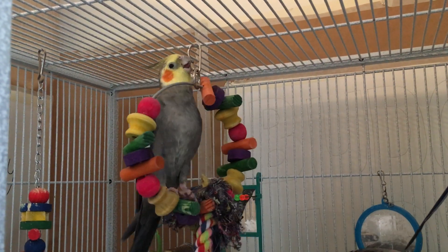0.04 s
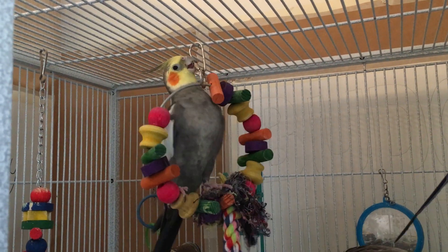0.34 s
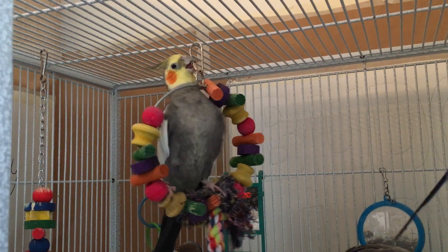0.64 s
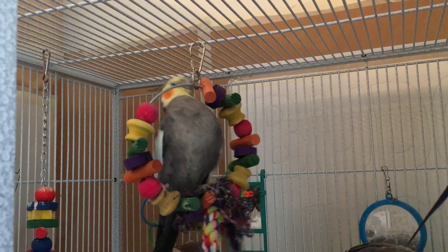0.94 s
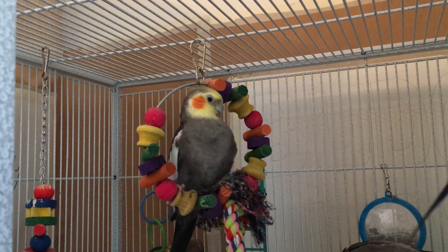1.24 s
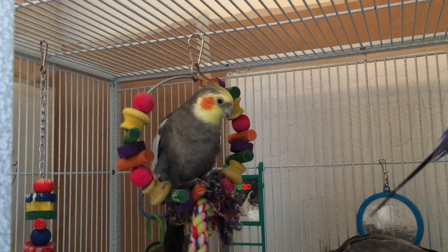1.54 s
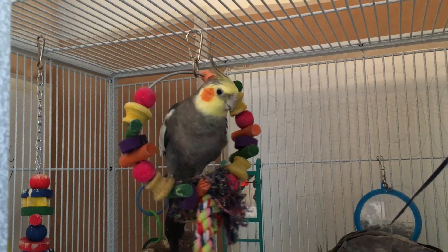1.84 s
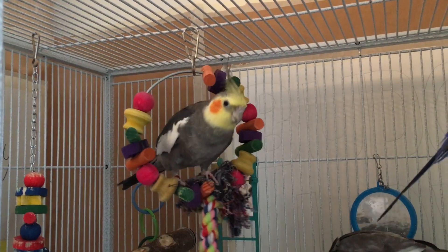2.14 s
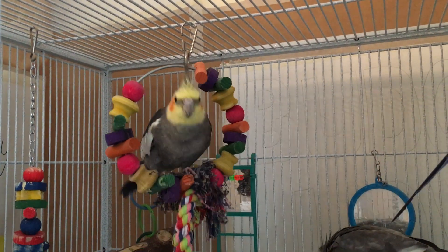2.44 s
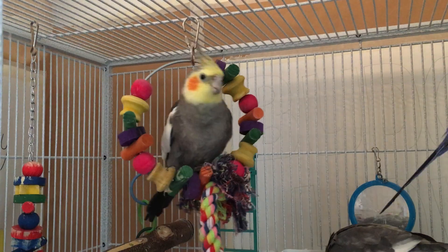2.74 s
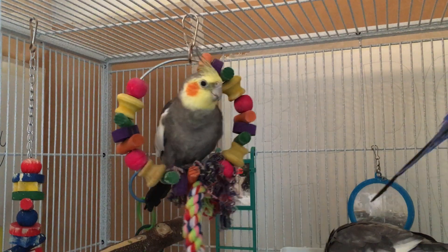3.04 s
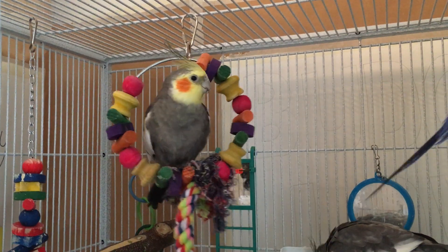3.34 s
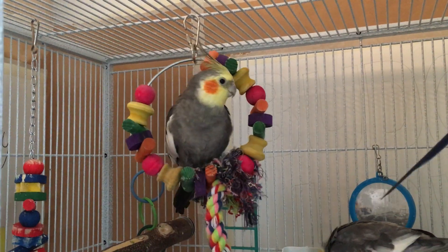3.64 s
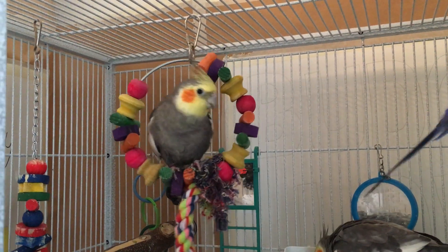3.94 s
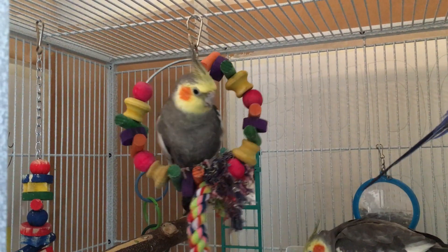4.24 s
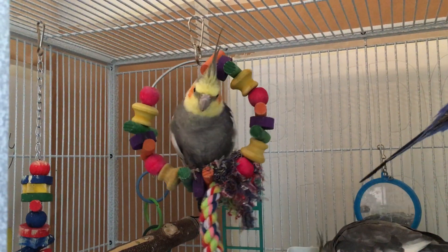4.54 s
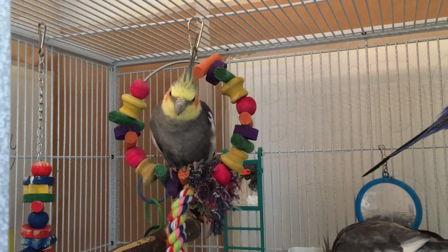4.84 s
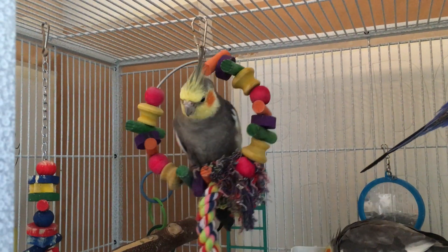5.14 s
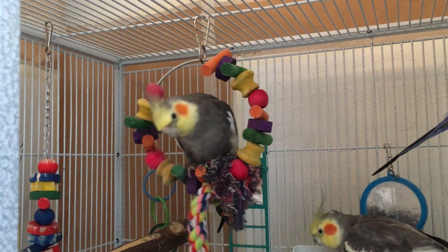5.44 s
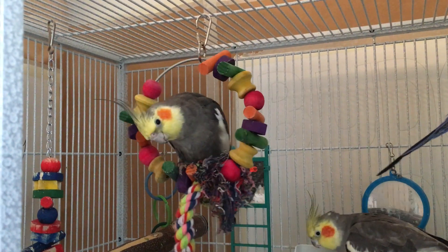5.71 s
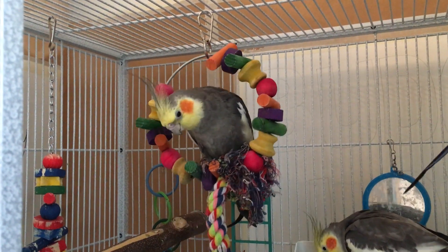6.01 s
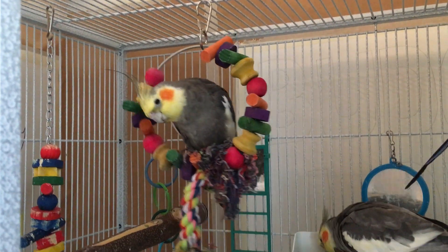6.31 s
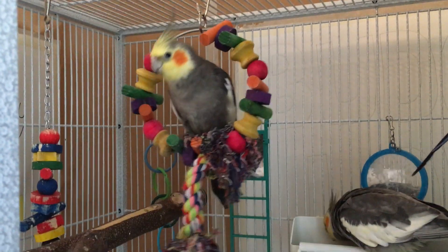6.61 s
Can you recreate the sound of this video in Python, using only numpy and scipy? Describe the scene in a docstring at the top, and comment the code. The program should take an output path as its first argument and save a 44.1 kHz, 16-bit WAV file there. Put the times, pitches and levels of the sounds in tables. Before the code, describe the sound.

Cockatiels chatter close to the microphone in a small, quiet room. A light tap on the wire cage comes first, then short gliding chirps that break into rasps. After a pause of about a second, the chirps return and build into a long run of harsh squawks, with soft bursts of whirring wings and a faint low hum underneath. A last few squawks and peeps follow.

```python
"""Cockatiels chatter close by: gliding chirps that break into rough noise, then a long run of harsh squawks.
A bird's voice organ whistles when it vibrates evenly and rasps when it vibrates chaotically.
Wings whirr in four bursts, pushing air and setting off a low hum, and something taps the wire cage.
A small, quiet room gives every call and tap a short tail of echoes."""
import sys
import numpy as np
from scipy import signal
from scipy.fft import rfft, irfft, next_fast_len
from scipy.io import wavfile
from scipy.ndimage import uniform_filter1d, map_coordinates

SR = 44100
rng = np.random.default_rng(int(sys.argv[2]) if len(sys.argv) > 2 else 0)


def wav_record(signal):
    """Record a signal, one row per channel, as 16-bit PCM in the file named by sys.argv[1]."""
    frames = np.transpose(np.atleast_2d(signal))
    bounded = np.clip(frames, -1, 1)
    # unit amplitude maps onto the largest positive 16-bit level
    quanta = np.round(bounded * 32767).astype(np.int16)
    wavfile.write(sys.argv[1], SR, quanta)


N = 298557
TIME = np.arange(N) / SR
TOP_HZ = 15900


def amp(db):
    """Turns decibels into a gain."""
    return 10 ** (np.asarray(db) / 20)


def unit(x):
    """Scales a sound to an average (rms) level of 1."""
    return x / np.sqrt(np.mean(x ** 2))


def gain_at(points, where):
    """Reads a gain off a curve of (frequency, level_db) points."""
    at, db = np.transpose(points)
    return amp(np.interp(np.log(np.maximum(where, at[0])), np.log(at), db))


def coloured(x, points):
    """Shapes the bass and treble of x by such a curve, at level 1."""
    return unit(irfft(rfft(x) * gain_at(points, np.fft.rfftfreq(len(x), 1 / SR)), len(x)))


def wobble(n, rate_hz):
    """A smooth random wiggle, about 1 in size, with rate_hz new values a second."""
    at = np.arange(n) * rate_hz / SR
    values = rng.standard_normal(int(at[-1]) + 2)
    return map_coordinates(values, [at], mode="nearest")


def add(mix, start_s, sound):
    """Mixes a sound in at start_s."""
    part = mix[round(start_s * SR):][:len(sound)]
    part += sound[:len(part)]


def fade(t, start, end, ramp_s):
    """Fades in at start and out at end."""
    return np.clip(np.minimum(t - start, end - t) / ramp_s, 0, 1)


def progress(x, begin, end):
    """Goes from 0 at begin to 1 at end."""
    return np.clip((x - begin) / (end - begin), 0, 1)


def timeline(length_s):
    """Seconds into a call (t), and the share of it that has passed (u)."""
    t = np.arange(0, length_s, 1 / SR)
    return t, t / length_s


def decay(t, ring_s):
    """Dies away by 60 dB in ring_s."""
    return np.exp(-np.log(1000) * t / ring_s)


# The tone of the quiet room: frequency_hz, level_db
ROOM_NOISE = [(60, -3.5), (400, -17), (14000, -34)]
def room_noise():
    """A faint, steady rush, strongest in the bass."""
    return amp(-67) * coloured(rng.standard_normal(N), ROOM_NOISE)


def room_echoes(x, tail_db=-13.5, early_s=.065, tail_s=.32):
    """Nearby walls add a few strong echoes, then the room adds a smooth tail."""
    early = rng.standard_normal(N) * (rng.random(N) < .03) * decay(TIME, early_s)
    tail = rng.standard_normal(N) * decay(TIME, tail_s)
    echoes = .65 * early / np.linalg.norm(early) + amp(tail_db) * tail / np.linalg.norm(tail)
    length = next_fast_len(N + SR)
    response = 1 + rfft(echoes, length)
    # keep the overall balance of bass and treble
    response /= np.sqrt(uniform_filter1d(abs(response) ** 2, size=2500))
    return irfft(rfft(x, length) * response, length)[:N]


# Knocks and ticks on the cage, and near 2.2 s a faint rustle made of the same short cracks: start_s, level_db
CAGE_TAPS = [(0.041, -49.5), (.253, -30.5), (2.183, -55), (2.207, -48.5)]
def cage_taps(ring_s=.054):
    """Each tap is a crack of noise that dies at once."""
    out, t = np.zeros(N), np.arange(0, ring_s, 1 / SR)
    for start_s, level_db in CAGE_TAPS:
        crack = coloured(rng.standard_normal(len(t)), [(400, -31.5), (1400, 7), (14000, -16.5)])
        add(out, start_s, amp(level_db) * crack * decay(t, ring_s))
    return out


# Low ringing notes, likely of the cage: pitch_hz, width_hz (narrow rings longer), level_db
HUM_NOTES = [(50.7, 6.1, -8), (222.8, 8.3, -12.5), (294.5, 6.6, -17)]
def hum(wing_level):
    """Gusts from the wings keep the low notes ringing."""
    out, t = np.zeros(N), TIME[:SR]
    for pitch_hz, width_hz, level_db in HUM_NOTES:
        ring = np.sin(2 * np.pi * pitch_hz * t) * np.exp(-np.pi * width_hz * t)
        gusts = wing_level * rng.standard_normal(N)
        out += amp(level_db) * signal.fftconvolve(gusts, ring / np.linalg.norm(ring))[:N]
    return out


# The tone of air brushed by feathers: frequency_hz, level_db
FEATHER_TONE = [(150, -8.5), (215, -4), (370, -3), (680, -9.5), (1200, -2), (7000, -30)]
# Bursts of flapping: start_s, end_s, level_db
WING_BURSTS = [(3.642, 3.865, -52.5), (4.093, 4.42, -47), (4.605, 5.494, -44), (6.239, 6.578, -46.5)]
def wings(beat_hz=34.66, swish_db=-1.5, ends_db=-3.5):
    """Up and down strokes both push air and swish, so the whirr is strongest at twice the beat rate."""
    level = np.zeros(N)
    for start, end, db in WING_BURSTS:
        off_middle = 2 * progress(TIME, start, end) - 1
        level += amp(db + ends_db * off_middle ** 2) * fade(TIME, start, end, ramp_s=.05)
    beats = np.cumsum(beat_hz * (1 + .03 * wobble(N, beat_hz / 2))) / SR
    phase = 2 * np.pi * beats
    push = unit(sum(height * np.sin(k * phase) * amp(5.5 * np.tanh(wobble(N, beat_hz)))
                    for k, height in enumerate([.25, 1, .48], 1)))
    # part of the swish repeats with every beat, which gives it a pitch
    repeating = rng.standard_normal(SR)[(beats % 1 * SR / beat_hz).astype(int)]
    strokes = 2 + np.sin(2 * phase) / 2 + np.sin(phase) / 2
    swish = coloured((repeating / 2 + rng.standard_normal(N)) * strokes, FEATHER_TONE)
    return level * (push + amp(swish_db) * swish) + hum(level)


# The tone of throat and beak: frequency_hz, level_db
THROAT_TONE = [(700, -24), (1500, -6.5), (3200, -1), (5600, -3.5), (7600, -8.5), (9300, -8.5),
               (11000, -16.5), (14000, -12.5)]
def throat(hz):
    """Throat and beak let some frequencies through better than others."""
    return gain_at(THROAT_TONE, hz)


def whistle(hz, overtone_db, split_db, rough):
    """Even vibration makes overtones; when its cycles alternate, the voice splits, adding tones between."""
    n = len(hz)
    shake = .02 * wobble(n, 240) + .1 * (rough + .16) * wobble(n, 1100)
    phase = 2 * np.pi * np.cumsum(hz * (1 + shake)) / SR
    k = np.arange(1, 11)[:, None] / 2  # multiples of the pitch: 0.5, 1, 1.5 ... 5
    split_tones = amp(split_db) * (2 * k) ** -1.8
    whole_tones = k ** -1.96 * amp(overtone_db * (k == 2))
    flicker = amp([4 * wobble(n, 175) for _ in k])
    heights = np.where(k % 1, split_tones, whole_tones) * throat(k * hz) * (k * hz < TOP_HZ) * flicker
    return unit((heights * np.sin(k * phase)).sum(0) / np.linalg.norm(heights, axis=0))


# How the rasp spreads around the pitch: multiple_of_pitch, level_db
RASP_SPREAD = [(.18, -15), (.42, -7.5), (.95, 4.5), (1.45, 1), (2.3, -7.5), (5, -19.5)]
def rasp(hz, bands, size=256):
    """Chaotic vibration makes noise around the pitch, bunched in bands hz / bands apart."""
    n = len(hz)
    f, t, spectrum = signal.stft(rng.standard_normal(n + size), SR, nperseg=size)
    multiple = f[:, None] / np.interp(t * SR, np.arange(n), hz)
    # brief tones come and go, gliding with the pitch
    pattern = rng.standard_normal((size, size))
    flicker_db = 5 * map_coordinates(pattern, np.broadcast_arrays(9 * multiple, 60 * t))
    bands_db = 3.5 * np.cos(2 * np.pi * bands * multiple)
    shape = gain_at(RASP_SPREAD, multiple) * throat(f)[:, None] * amp(flicker_db + bands_db)
    noise = signal.istft(spectrum * shape / np.linalg.norm(shape, axis=0), SR)[1][:n]
    return unit(noise * amp(1.5 * wobble(n, 640)))


CLEAN_SPLIT_DB = -27  # a clean whistle hardly splits
def voice(t, hz, level_db, overtone_db, split_db, rough, bands=2):
    """A whistle that trembles and gives way to rasp as rough goes from 0 to 1."""
    rough = np.clip(rough, 0, 1)
    hz = hz * (1 + .03 * wobble(len(t), 110))
    tone = whistle(hz, overtone_db, split_db, rough)
    tremble = amp(7 * np.sqrt(rough) * np.tanh(wobble(len(t), 300)))
    chaos = np.pi / 2 * rough ** 1.35
    blend = np.cos(chaos) * unit(tone * tremble) + np.sin(chaos) * rasp(hz, bands)
    return amp(level_db) * blend * fade(t, 0, t[-1], ramp_s=.0018)


def glide(u, from_hz, to_hz):
    """A pitch that moves fast at first, then settles as u reaches 1."""
    return to_hz + (from_hz - to_hz) * np.clip(1 - u, 0, 1) ** 1.4


# How squarely the chirping bird faces the listener: time_s, treble_db
BEAK_AIM = [(.9, -6.5), (1.55, -3.5), (3.4, 3.5), (3.65, -3), (5.9, -11)]
def head_turns(x, low_hz=4850):
    """The beak sends treble forward, so chirps brighten when the bird faces the listener."""
    band = signal.butter(3, [low_hz, 2 * low_hz], "band", fs=SR, output="sos")
    treble_gain = amp(np.interp(TIME, *np.transpose(BEAK_AIM)))
    return x + (treble_gain - 1) * signal.sosfiltfilt(band, x)


# Short notes: start_s, length_s, from_hz, to_hz, level_db, overtone_db, roughness (0-1)
PEEP_NOTES = [ (0.34, 0.055, 1984, 1480, -47.5, 4.5, 0.17), (0.495, 0.11, 1395, 1012, -47, 4, 0.11),
              (0.572, 0.048, 4300, 3740, -43, 8, 0.26), (0.672, 0.024, 2966, 3316, -20, -1, 0),
              (0.817, 0.045, 3730, 3314, -24, -0.5, 0.51), (0.849, 0.063, 2234, 1710, -35, 12, 0.49),
              (0.907, .022, 2830, 4060, -22, 0.5, 0.17), (1.304, 0.027, 1520, 2025, -53, -4.5, .14),
              (1.464, 0.034, 4170, 3720, -24, -5, 0.14), (1.494, .022, 2026, 1500, -27, 25, 0),
              (1.804, 0.024, 2923, 2456, -20.5, 23, 0.24), (2.872, 0.028, 2095, 2114, -29.5, 9.5, 0.03),
              (3.245, 0.017, 2270, 2310, -28.5, 10, 0.11), (3.4, 0.023, 4225, 3280, -21, 0, 0.15),
              (3.609, 0.024, 2894, 3230, -24.5, -3, 0), (3.619, .037, 3130, 1690, -31.5, 7.5, 0.51),
              (5.033, 0.12, 3077, 1593, -32.5, 5, 0.66), (5.555, 0.031, 2980, 1310, -25.5, 13.5, 0.29),
              (5.875, 0.032, 2436, 1814, -25, 11, 0.16), (6.661, 0.067, 1934, 2840, -33, -9, 0.22),
              (6.724, 0.044, 3186, 1437, -27, 9, 0.43)]
def peep(length_s, from_hz, to_hz, peak_db, overtone_db, rough, ends_db=-9.5):
    """One glide, loudest in the middle; the rougher it is, the more it splits."""
    t, u = timeline(length_s)
    level_db = peak_db + ends_db * (2 * u - 1) ** 2
    return voice(t, glide(u, from_hz, to_hz), level_db, overtone_db, CLEAN_SPLIT_DB * (1 - rough), rough)


# Full chirps: start_s, length_s, open_hz, dip_hz, crest_hz, crest_at (0-1 of the call), open_db,
# crest_db, dip_overtone_db, dip_split_db, dip_roughness (0-1), crest_roughness (0-1)
WARBLE_CALLS = [ (0.619, .15, 2600, 1800, 3650, 0.5, -36.5, -24.5, 10.5, -9, 0.65, 0.48),
                (1.333, 0.09, 3170, 2430, 3300, 0.28, -39.5, -44.5, -12, -20, 0.1, 0.33),
                (1.59, 0.11, 4250, 2540, 4080, 0.51, -22.5, -25, 19.5, -29, 0.2, 0.34),
                (2.886, 0.098, 2550, 2600, 3400, 0.34, -19, -32, -1, -29, 0.33, 0.42),
                (3.071, 0.15, 4400, 2550, 4100, 0.62, -21.5, -27.5, 7, -45, 0.65, 0.16),
                (3.257, .085, 3850, 2500, 2600, 0.77, -22.5, -28.5, -25, -51, 0.3, 0.28),
                (3.42, 0.13, 4000, 2100, 4000, 0.6, -20, -27.5, 6.5, -32, 0.33, 0.56),
                (3.659, 0.088, 2870, 2200, 3800, 0.55, -23.5, -21, -5.5, -27, 0.6, 0.25),
                (4.448, 0.1, 4800, 3700, 4150, 0.41, -19.5, -19.5, 4.5, -1, 0.48, 0.42),
                (4.601, .105, 5200, 3300, 3600, .62, -17.5, -22.5, 7, -22, 0.6, 0.4),
                (4.77, 0.089, 4450, 3600, 4250, 0.47, -20, -20.5, -7.5, 5, 0.56, .27),
                (5.277, 0.11, 5050, 3100, 3850, 0.45, -13.5, -22.5, -10, -12.5, 0.65, 0.52),
                (5.732, 0.093, 4450, 3900, 4150, 0.36, -15.5, -19.5, 8.5, -8, 0.54, 0.29),
                (5.904, 0.088, 3200, 2600, 3000, 0.35, -19.5, -29, 6, -31, 0.42, 0.17)]
def warble(length_s, open_hz, dip_hz, crest_hz, crest_at, open_db, crest_db, overtone_db, dip_split_db,
           dip_rough, crest_rough, end_hz=2600, end_split_db=2.5, end_rough=.4, attack_s=.0097):
    """A clean falling whistle snaps into a rough dip, climbs to a crest, then collapses and splits."""
    t, u = timeline(length_s)
    dip_at = .62 * crest_at
    fall, drop = progress(u, 0, dip_at), progress(u, crest_at, .97)
    climb = np.sin(np.pi / 2 * progress(u, dip_at, crest_at)) ** 2
    # the voice breaks partway down each slope
    snapped, collapsed = progress(fall, .35, .55), progress(drop, .35, .55)
    snap_hz = open_hz + (dip_hz - open_hz) * snapped
    hz = (glide(fall, open_hz, dip_hz) + snap_hz) / 2
    hz += (crest_hz - dip_hz) * climb + (end_hz - crest_hz) * drop ** 1.15
    dip_db, end_db = (open_db + crest_db) / 2 - 4, crest_db - 11
    level_db = np.interp(u, [0, dip_at, crest_at, 1], [open_db, dip_db, crest_db, end_db])
    level_db -= 19 * (1 - progress(t, 0, attack_s))
    in_dip = snapped * (1 - climb)
    rough = dip_rough * in_dip + crest_rough * climb * (1 - collapsed) + end_rough * collapsed
    split_db = CLEAN_SPLIT_DB + (dip_split_db - CLEAN_SPLIT_DB) * in_dip
    split_db += (end_split_db - CLEAN_SPLIT_DB) * collapsed
    return voice(t, hz, level_db, overtone_db * in_dip, split_db, rough)


# Harsh calls: start_s, length_s, peak_at (0-1 of the call), pitch_hz, peak_db, swell_db (rise to the peak)
SQUAWK_CALLS = [ (0.375, 0.074, 0.52, 3568, -24, 11.5), (0.718, 0.063, 0.5, 4380, -22, 4.5),
                (1.48, 0.063, 0.62, 4180, -28, 11.5), (1.776, 0.07, 0.5, 5240, -25.5, 8.5),
                (3.782, 0.12, .5, 4364, -26, 7), (3.897, 0.09, 0.34, 4650, -21, 9),
                (4.015, 0.13, 0.53, 3730, -19, 12.5), (4.144, 0.071, 0.43, 3380, -21, 11),
                (4.345, 0.11, 0.3, 3920, -26.5, 16.5), (4.536, 0.09, 0.4, 5748, -23, 6),
                (4.684, 0.1, 0, 2960, -24.5, 3), (4.864, 0.1, 0.2, 3034, -27, 6.5),
                (4.972, 0.092, 0.61, 4270, -20, 9.5), (5.155, 0.057, 0.58, 3393, -25, 7.5),
                (5.258, 0.042, .65, 3660, -25.5, 7.5), (5.371, 0.099, 0.43, 4360, -20.5, 11),
                (5.487, 0.077, 0.5, 5810, -23, 11.5), (5.621, 0.12, 0.61, 5725, -20.5, 10.5),
                (6.285, 0.086, 0.36, 2697, -22.5, 16.5), (6.443, 0.053, 0.44, 3263, -21.5, 10),
                (6.526, 0.12, .44, 4030, -19, 11), (6.731, 0.067, 0.39, 4850, -26.5, 10.5)]
def squawk(length_s, peak_at, pitch_hz, peak_db, swell_db, fade_db=12.5):
    """A rough call that swells and fades; its pitch rises with effort and sinks as the beak closes."""
    t, u = timeline(length_s)
    off_peak = np.interp(u, [0, peak_at, 1], [1, 0, 1])
    effort_db = -np.where(u < peak_at, swell_db, fade_db) * off_peak ** 1.3
    sag = np.exp(-.25 * progress(u, peak_at, .99))
    hz = pitch_hz * amp(.09 * effort_db) * sag
    return voice(t, hz, peak_db + effort_db, overtone_db=0, split_db=2.5, rough=.84, bands=3)


def scene():
    """Calls and taps echo in the room, over wingbeats and faint noise."""
    chirps, squawks = np.zeros((2, N))
    for start_s, *row in WARBLE_CALLS:
        add(chirps, start_s, warble(*row))
    for start_s, *row in PEEP_NOTES:
        add(chirps, start_s, peep(*row))
    for start_s, *row in SQUAWK_CALLS:
        add(squawks, start_s, squawk(*row))
    background = room_noise()
    calls_and_taps = room_echoes(head_turns(chirps) + squawks + cage_taps())
    return (background + wings() + calls_and_taps)[None]


def record(dry):
    """Cuts the treble above TOP_HZ."""
    lowpass = signal.firwin(511, TOP_HZ, window="blackman", fs=SR)
    return signal.oaconvolve(dry, lowpass[None], "same")


dry = scene()
out = record(dry)
wav_record(out)
```